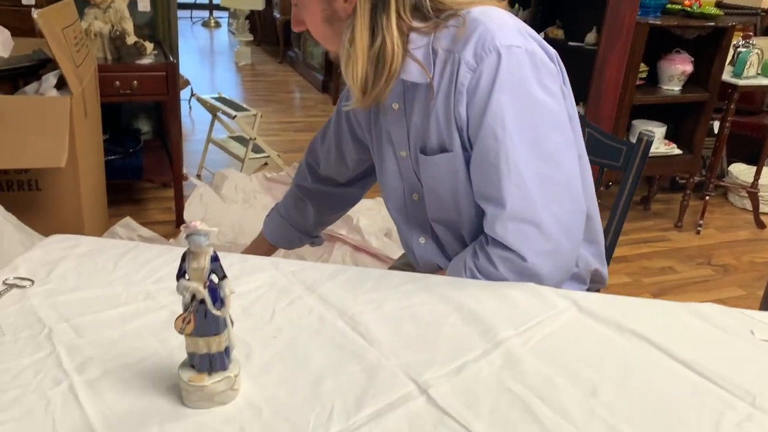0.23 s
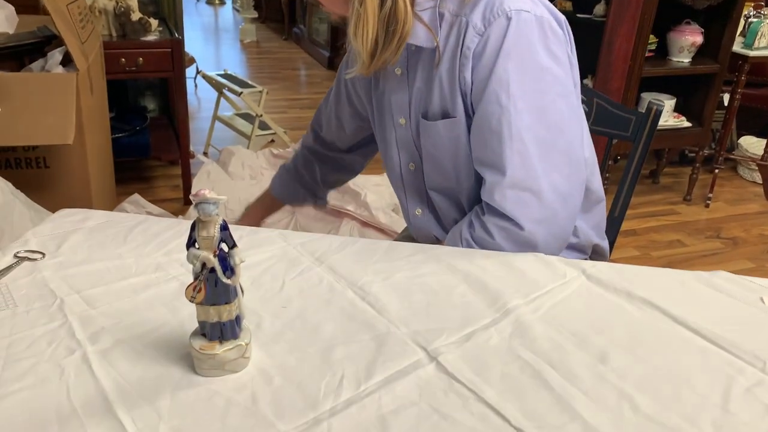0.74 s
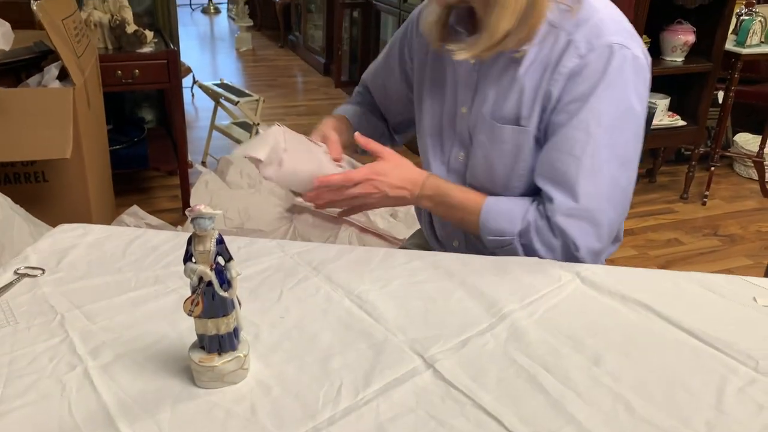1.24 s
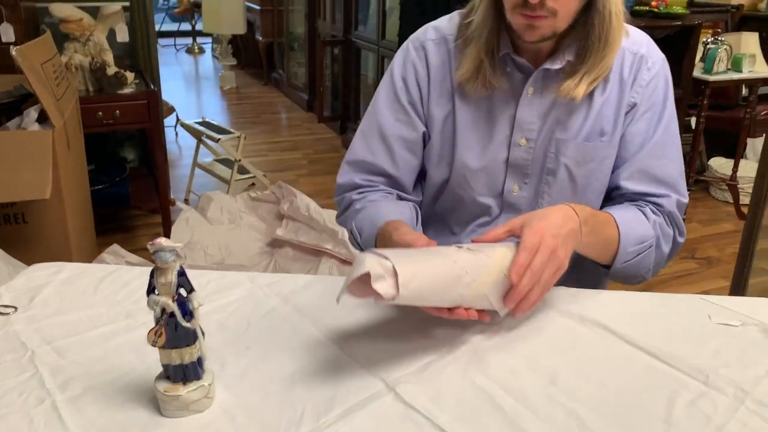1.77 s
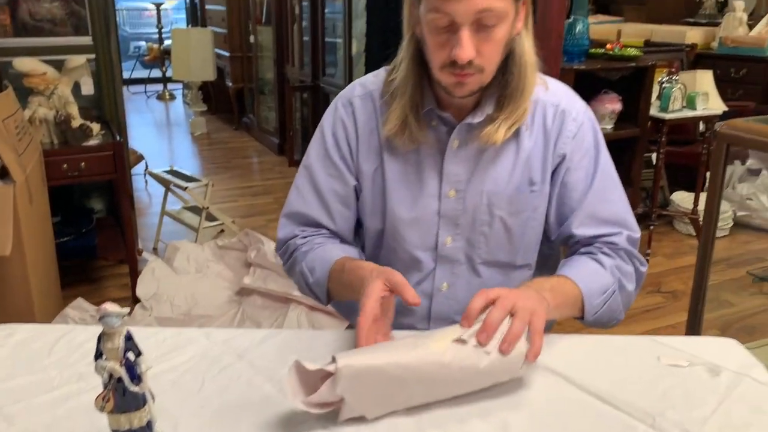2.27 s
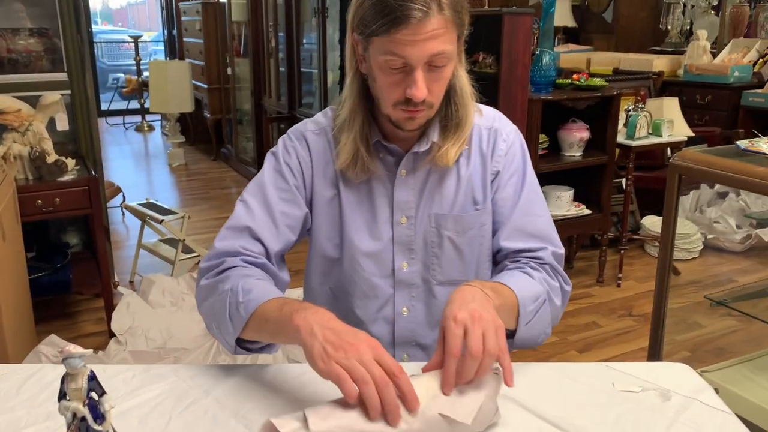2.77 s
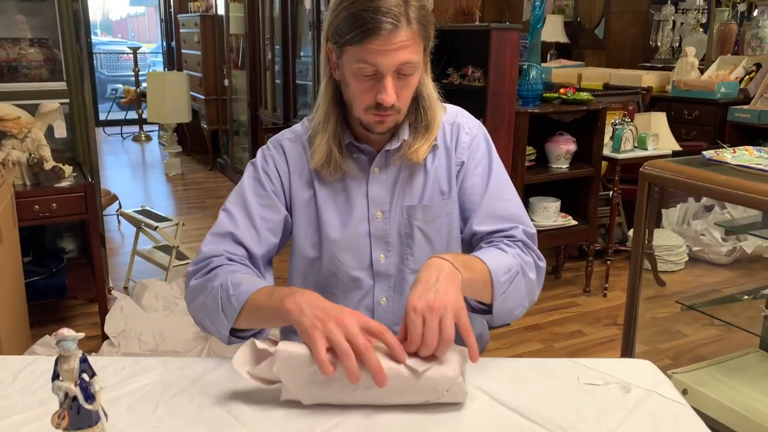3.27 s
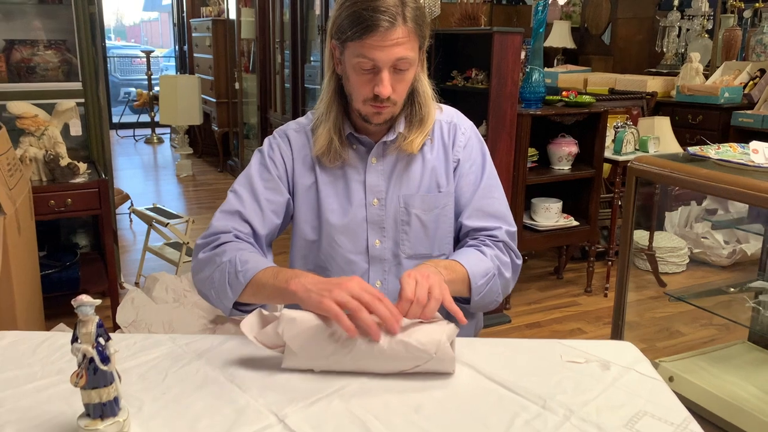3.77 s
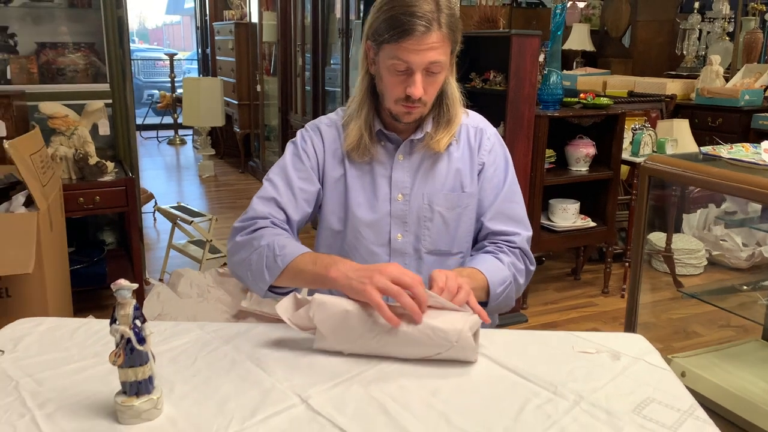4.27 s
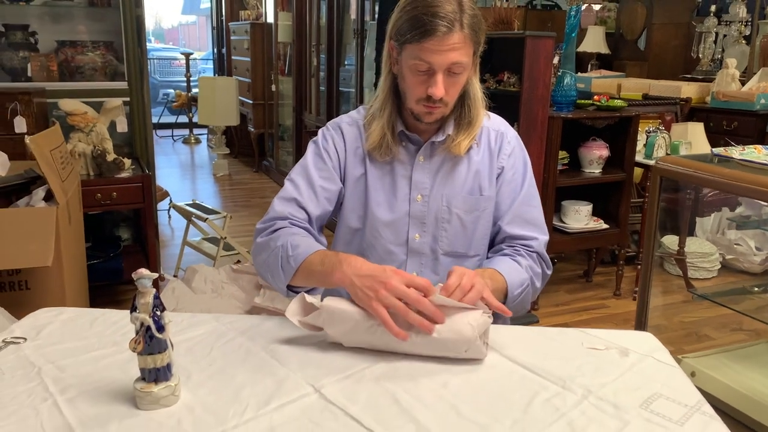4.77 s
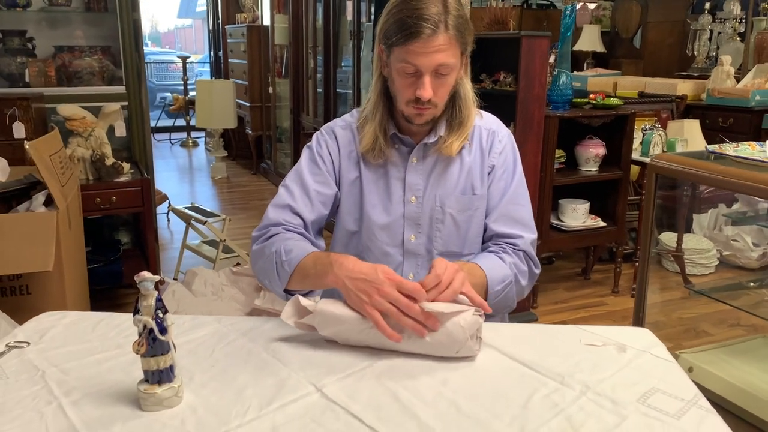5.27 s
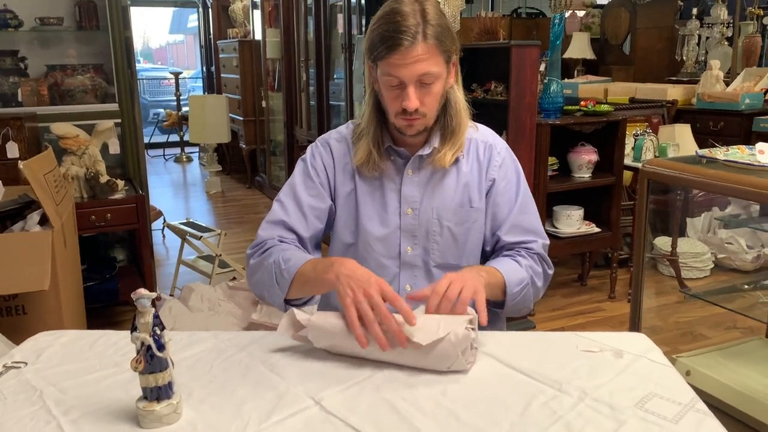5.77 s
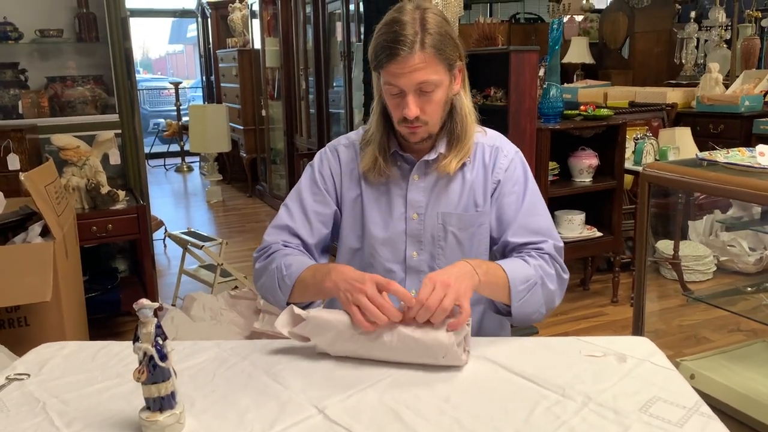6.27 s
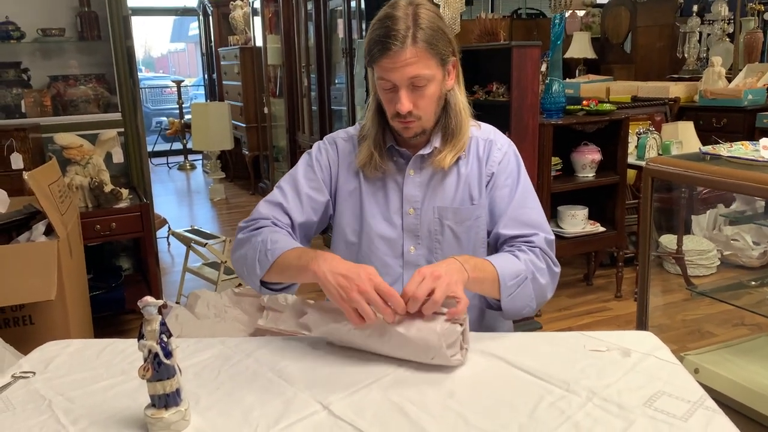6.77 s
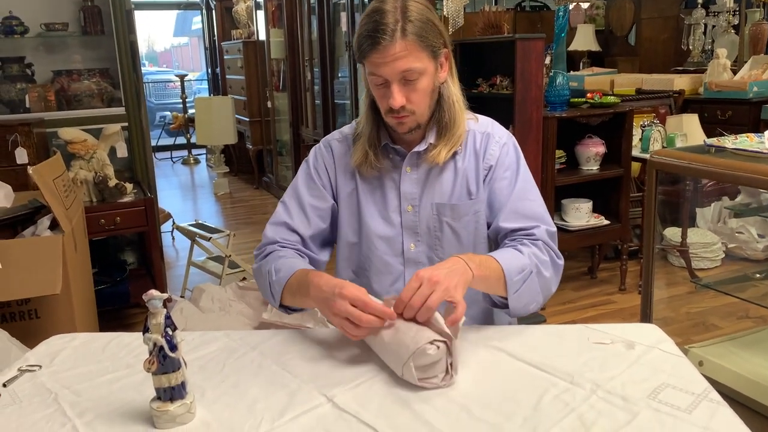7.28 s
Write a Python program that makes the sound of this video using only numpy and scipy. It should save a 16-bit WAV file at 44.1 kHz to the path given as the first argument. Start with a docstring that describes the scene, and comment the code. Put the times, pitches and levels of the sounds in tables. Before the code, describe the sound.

Stiff packing paper crackles and rustles close by as hands turn and unfold a wrapped bundle in a quiet, softly humming shop.

```python
"""A paper-wrapped bundle is lifted off a heap of packing paper, laid on a cloth-covered table and picked open.
Creases buckle in swarms of tiny filtered noise clicks, and stiff ones snap with a pitched crack.
Palms and sheets rub in denser swarms, and decaying sine modes make the hollow wrap pop dully.
A phone close by hears it in a quiet shop: a short room echo, over filtered-noise rumble and hum of ventilation."""
import sys
import numpy as np
from scipy import signal
from scipy.fft import rfft, irfft, next_fast_len
from scipy.io import wavfile
from scipy.ndimage import uniform_filter1d

SR = 44100
rng = np.random.default_rng(int(sys.argv[2]) if len(sys.argv) > 2 else 0)


def put_to_file(sound):
    """Save the sound as 16-bit audio at rate SR, in the file named by the first command-line argument."""
    columns = np.atleast_2d(sound).T  # one column per channel
    safe = np.clip(columns, -1, 1)
    whole_steps = np.round(safe * 32767)
    wavfile.write(sys.argv[1], SR, whole_steps.astype(np.int16))


N = 331382


def undb(db):
    """Decibels to gain."""
    return 10 ** (np.asarray(db) / 20)


def rms(x):
    """Root mean square."""
    return np.sqrt(np.mean(x ** 2))


def unit(x):
    """Scale a mid/side pair so that the mid has rms 1."""
    return x / rms(x[0])


def at(points, hz):
    """Read (Hz, value) points on a log-frequency axis."""
    f, value = np.transpose(points)
    return np.interp(np.log(hz + 1), np.log(f + 1), value)


def colour(x, points):
    """Causal minimum-phase filter with the given (Hz, dB) response, built by folding its cepstrum."""
    size = 2 * next_fast_len(x.shape[-1])
    gain = undb(at(points, np.fft.rfftfreq(size, 1 / SR)))
    cepstrum = irfft(np.log(gain))
    cepstrum[1:size // 2] *= 2
    cepstrum[size // 2 + 1:] = 0
    response = np.exp(rfft(cepstrum))
    return irfft(rfft(x, size) * response)[..., :x.shape[-1]]


def walk(rate):
    """Slow random drift, taking rate new values a second, with a spread near 1."""
    hold = int(SR / rate)
    steps = rng.standard_normal(N // 50)[np.arange(N) // hold]
    return np.sqrt(3 / 2) * uniform_filter1d(steps, hold)


def add(out, s, sound):
    """Mix a short sound in at time s."""
    start = max(int(s * SR), 0)
    out[:, start:start + sound.shape[1]] += sound[:, :max(N - start, 0)]


def facet(flip_s, ring_s, ring_db, patchy_db, size=1536, count=36):
    """One paper facet flips over, then the sheet around it rings briefly; every facet has its own resonances."""
    t = np.arange(size) / SR
    flip = t / flip_s * np.exp(1 - t / flip_s)
    ring = undb(ring_db) * np.exp(-t / ring_s) * (1 - np.exp(-t / flip_s))
    resonances = np.column_stack([np.geomspace(200, 18000, count), patchy_db * rng.standard_normal(count)])
    return unit(colour(rng.standard_normal((2, size)) * (flip + ring), resonances))


def swarm(rate, scatter_db, flip_s, ring_s, ring_db, patchy_db, dwell_s, count=120, size=24000):
    """Facets flip at random, rate times a second, their strengths scattered exponentially in dB; mid rms 1."""
    facets = [facet(flip_s, ring_s, ring_db, patchy_db) for _ in range(count)]
    rate = np.broadcast_to(rate, N)
    waits, strengths, strays = rng.exponential(size=(size, 3)).T
    starts = np.searchsorted(np.cumsum(rate) / SR, np.cumsum(waits))
    # positive scatter: many small and a few large; negative: the reverse
    gains = undb(scatter_db * np.minimum(strengths, 4))
    # a fold runs through one patch of paper for a moment, so neighbouring clicks share their colour
    patches = (starts / SR / dwell_s + strays / 2).astype(int) % count
    out = np.zeros((2, N))
    for k, start in enumerate(starts[starts < N]):
        # denser clicks are softer, so the rate alone does not raise the level
        add(out, start / SR, facets[patches[k]] * gains[k] / np.sqrt(rate[start]))
    return unit(out)


def steady(x, window_s=0.0384):
    """Even out a grainy sound to a mean power near 1, so that a separate curve sets its level."""
    power = uniform_filter1d(x[0] ** 2, max(int(window_s * SR), 8))
    return x / np.sqrt(power + np.mean(power) / 20)


# every movement swells, slackens while it lasts and dies away
ATTACK_S, SLACKEN_DB_PER_S, RELEASE_S = 0.016, 10, 0.018


def effort(movements, rest_db=(-80, -80)):
    """Level curves in dB: the power of swelling and fading movements adds to a resting level."""
    power = undb(np.reshape(rest_db, (len(rest_db), -1))) ** 2 * np.ones(N)
    t = np.arange(SR) / SR
    for start_s, length_s, *level_db in movements:
        attack = np.minimum(t / ATTACK_S, 1)
        release = np.exp(-np.maximum(t - length_s, 0) / RELEASE_S)
        shape = attack * undb(-SLACKEN_DB_PER_S * t) * release
        add(power, start_s, np.outer(undb(level_db), shape) ** 2)
    return 10 * np.log10(power)


# Spectrum of the duct rumble. Each row: frequency in Hz, relative level in dB per Hz.
RUMBLE_COLOUR = [(15, -33), (28, -12), (45, 0), (60, 1), (75, -1), (110, -8), (140, -3.5), (175, -9),
                 (290, -9.5), (520, -27), (1200, -31.5), (3000, -42), (9000, -50), (16000, -54)]
# Fan hum partials. Each row: mean frequency in Hz, rms level in dB around which it wavers.
FAN_HUM = [(90.5, -48), (312, -54.5)]


def ventilation(rumble_db=-39.5, waver_db=-2.0, swell_db=1.25):
    """Duct rumble is slowly swelling noise; the fan hum is sines wavering in pitch and level."""
    out = unit(colour(rng.standard_normal((2, N)), RUMBLE_COLOUR)) * undb(rumble_db + swell_db * walk(14))
    for hz, db in FAN_HUM:
        phase = 2 * np.pi * np.cumsum(hz * (1 + 0.02335 * walk(12))) / SR
        out[0] += np.sqrt(2) * undb(db + waver_db * walk(9.4)) * np.sin(phase)
    return out


# Loose sheets shift in the heap on the floor.
# Each row: start in seconds, length in seconds, rustle level in dB, crinkle level in dB before its trim.
HEAP_MOVES = [(0.0, 0.35, -55.5, -64), (0.177, 0.042, -42, -35), (0.265, 0.032, -40.5, -68),
              (0.297, 0.03, -35.5, -64), (0.385, 0.039, -45.5, -40.5), (0.435, 0.044, -34.5, -34.5),
              (0.49, 0.026, -37, -41), (0.52, 0.31, -44.5, -45), (0.62, 0.037, -44, -39),
              (0.67, 0.14, -34, -42), (0.712, 0.03, -32, -34), (0.785, 0.0051, -40, -27),
              (0.835, 0.025, -37.5, -68), (0.89, 0.044, -47, -75), (0.95, 0.0084, -41.5, -41),
              (1.066, 0.019, -50, -41)]
# Dull spectrum of the rustling heap. Each row: frequency in Hz, relative level in dB per Hz.
RUSTLE_COLOUR = [(100, -18), (200, -11), (320, -2), (560, -3.5), (750, -8), (1100, -9), (2500, -14),
                 (5000, -23), (9000, -31), (16000, -55)]


def heap(crinkle_trim_db=-1.5, wide_db=3):
    """Loose sheets on the floor shift, many at once; from behind the table their clicks arrive smeared and wide."""
    rustle_db, crinkle_db = effort(HEAP_MOVES)
    slips = swarm(700, scatter_db=2.8, flip_s=.001, ring_s=.012, ring_db=-6, patchy_db=3.5, dwell_s=.008)
    clicks = swarm(1200, scatter_db=-4.0, flip_s=0.00014, ring_s=0.0086, ring_db=0, patchy_db=5.5, dwell_s=.004)
    out = steady(colour(slips, RUSTLE_COLOUR)) * undb(rustle_db)
    out += unit(colour(clicks, CREASE_COLOUR)) * undb(crinkle_db + crinkle_trim_db)
    mid, side = out
    return np.array([mid, side * undb(wide_db)])


# small creases give way just before a big one: level relative to its crack, growth time, time to settle after it
STRAIN_DB, STRAIN_RISE_S, STRAIN_SETTLE_S = -17, 0.009, 0.005


def strain():
    """Small creases yield under the load that builds up to each snap: the power this adds to the crinkle."""
    t = np.arange(-4096, 4096) / SR
    shape = np.exp(np.minimum(t / STRAIN_RISE_S, -t / STRAIN_SETTLE_S))
    power = np.zeros((1, N))
    for s, level_db, *_ in CREASE_SNAPS:
        add(power, s + t[0], (undb(level_db + STRAIN_DB) * shape[None]) ** 2)
    return power[0]


# Bright spectrum of tiny creases. Each row: frequency in Hz, relative level in dB per Hz.
CREASE_COLOUR = [(300, -50), (1000, -6), (2200, -8.5), (3900, -1.5), (5800, -5.5), (7500, -3.5), (9500, 0),
                 (12500, -3), (16000, -14.5)]


def crinkle(level_db, trim_db=0.7, clump_db=0.84):
    """Bending the sheet sets off tiny creases in clumps, more of them the harder it is bent."""
    rate = 1500 * undb(.5 * (np.maximum(level_db, -60) + 37))  # 1500 clicks a second at -37 dB
    clicks = swarm(rate, scatter_db=4.1, flip_s=.00025, ring_s=.005, ring_db=-14, patchy_db=3.5, dwell_s=.016)
    return unit(colour(clicks, CREASE_COLOUR)) * undb(level_db + trim_db + clump_db * walk(45))


# each crease pings at its own pitch: level relative to its crack, decay in cycles
PING_DB, PING_CYCLES = -7, 3
# the panel beside it swings, the more the duller the crack: dB relative to the crack, dB per dB of tilt
SWING_DB, SWING_PER_TILT = -14, -0.96


def crease_ping(hz, size=1536):
    """The facet beside a crease rings for a few cycles at its own pitch."""
    cycles = np.arange(size) / SR * hz
    phase = 2 * np.pi * rng.random((2, 1))
    return unit(np.sin(2 * np.pi * cycles + phase) * np.exp(-cycles / PING_CYCLES) * (1 - np.exp(-cycles)))


# Creases that snap. Each row: start in seconds, crack level in dB rms over its first 4 ms,
# treble tilt in dB before the common lean, tail in dB before its trim, ping pitch in Hz.
CREASE_SNAPS = [(0.1962, -28.5, 12, 10, 10800), (0.31, -33.0, -11.5, 4, 3370), (0.439, -30.0, -2, 18, 6700),
                (0.9569, -38.5, -4.0, -5, 6500), (1.2259, -29.5, 6, -8, 9800),
                (1.683, -27.0, -3.0, -22.0, 4660), (1.732, -14.0, 12.5, -24.0, 10100),
                (1.758, -25.0, 2, -16.0, 6000), (1.767, -26, 4, -22.0, 10800), (1.795, -26, -3, -9, 1500),
                (1.8008, -21.0, 4, -6, 4600), (1.865, -23, 2, -6, 11500), (1.9202, -29, -7, -13, 6330),
                (2.0497, -32, 20, -16, 1527), (2.1581, -29.0, -9.5, -19, 1895),
                (2.2044, -28, -4, -14, 3970), (2.2277, -21, -5, -22.0, 11600), (2.245, -21, 1, -7, 5080),
                (2.2632, -26, 3, -16, 1580), (2.297, -16.0, 14, -28, 6850), (2.3343, -22.5, -2.5, -7, 6360),
                (2.4232, -29.0, -8, -19, 1710), (2.4758, -30, -5, -8.5, 2780), (2.626, -31, -2, -13, 1970),
                (2.8791, -23.5, -1, -10.0, 7150), (3.0006, -25.5, -5.5, -18.0, 10340),
                (3.0555, -26.5, -6.5, -19.5, 3500), (3.2032, -23.0, -1.5, -7, 6710),
                (3.28, -29.0, 2, -1, 10230), (3.3332, -27, -4, -8.5, 6000), (3.348, -26, 0, -16, 9600),
                (3.4494, -25, 0, 1, 4065), (3.4691, -28.5, -10, -21, 10040),
                (3.5219, -16.5, 5.5, -27, 9650), (3.5549, -20.5, 14, -17.0, 9510),
                (3.623, -29, 1, -14, 1510), (3.642, -29, 12, 10, 11460), (3.865, -28.0, 0, -9, 10490),
                (3.999, -26.0, 3.5, 2, 7600), (4.1927, -30, 5, -6, 3700), (4.2103, -23, 0.5, -14, 3590),
                (4.225, -28.0, 2, -6, 3124), (4.342, -22, 15, -24, 11620), (4.3995, -23, 23, -15.0, 9660),
                (4.5196, -10.5, 1, -3, 3895), (4.5462, -15, 5, -10, 10770), (4.5874, -26.5, 0, -22, 10860),
                (4.6297, -26.0, -6.5, -2, 3520), (4.6721, -31, -6, -16, 890), (4.701, -28.5, 2, 5, 3380),
                (4.7946, -34, -4, -2, 1993), (4.9926, -25, 12, -14, 11370),
                (5.0054, -24.5, -1, -16.5, 6440), (5.0304, -29, 25.0, -26.5, 11270),
                (5.0546, -18.5, 4, 0, 11460), (5.0608, -26, 2, -16, 11100), (5.306, -32, -0.5, -20, 10370),
                (5.458, -26.0, -1, 11, 10070), (5.5034, -13.5, -1, 8, 5010), (5.5123, -21, -1, 0, 11350),
                (5.5742, -19, 15, -32, 10070), (5.7299, -27.5, -7, 12, 3420), (5.7865, -22, -3.5, 14, 4940),
                (5.9192, -28.0, -1, -30, 10430), (6.1175, -21.5, -2, 1, 6600),
                (6.1369, -21.0, 2.5, -12, 11160), (6.157, -24.5, 6, -22, 10150),
                (6.1748, -24.5, 15, 7, 11340), (6.2345, -21.0, 1, -14, 11480), (6.2527, -25, -6.5, 7, 3680),
                (6.2854, -22.0, 10, -3, 10520), (6.3051, -23.5, 2, -18, 10930),
                (6.31, -14.5, 3.5, -10, 4600), (6.523, -30, -2, -13, 10020),
                (6.5791, -20.5, -3, -16, 10060), (6.6436, -24.5, 9.5, -10, 4555),
                (6.705, -25, 1, 6.0, 11020), (6.763, -31.5, 1, -16, 918), (6.8041, -20, 3, 2, 10700),
                (6.83, -29, 2, -16, 4140), (6.8528, -26, 2, -18.0, 3660), (6.8763, -28, -4, 5, 3930),
                (6.9539, -27.5, 4, 1, 10320), (6.968, -26.5, 5, 1, 3340), (7.0543, -29.5, -1, 21, 11010),
                (7.1587, -24.5, 2, -5, 3486), (7.3979, -24.5, 5, 2, 12100), (7.4394, -17, -5.5, -9, 1393),
                (7.4859, -26, -7, 3, 1285)]
# Spectrum of the crack. Each row: frequency in Hz, relative level in dB per Hz.
CRACK_COLOUR = [(300, -45), (1000, 0), (2200, -8.5), (3900, 2.5), (5800, -1), (7500, 1), (9500, 6.5),
                (12500, 0.5), (16000, -5)]
# Spectrum of the swinging panel. Each row: frequency in Hz, relative level in dB per Hz.
PANEL_COLOUR = [(100, -12.5), (200, -22), (310, -2.5), (600, -3.5), (1000, -5), (1500, -6), (2500, -7),
                (6000, -43.5)]


def snaps(tail_trim_db=-3, lean_db=-2, size=176):
    """A stiff crease gives way: a bright pitched crack, a shiver of the sheet, a slower swing of the panel."""
    out = np.zeros((2, N))
    for s, level_db, tilt_db, tail_db, hz in CREASE_SNAPS:
        swing_db = level_db + SWING_DB + SWING_PER_TILT * tilt_db
        slope_db = (tilt_db + lean_db) / 2
        # the quicker the flip, the brighter the crack
        flip_s = .00045 * undb(-slope_db)
        crack = facet(flip_s, ring_s=.009, ring_db=tail_db + tail_trim_db, patchy_db=2.5)
        crack = colour(colour(crack, CRACK_COLOUR), [(4500, -slope_db), (8500, slope_db)])
        ping = crease_ping(hz)
        crack = crack / rms(crack[0, :size]) + undb(PING_DB) * ping / rms(ping[0, :size])
        panel = colour(facet(flip_s=0.0018, ring_s=0.014, ring_db=10.0, patchy_db=-2.0), PANEL_COLOUR)
        add(out, s, crack / rms(crack[0, :size]) * undb(level_db))
        add(out, s, panel / rms(panel[0, :2 * size]) * undb(swing_db))
    return out


# the taut sheet sings after a crack: centre, width, decay, level relative to a crack of no tilt
SHEET_HZ, SHEET_WIDTH_HZ, SHEET_DECAY_S, SHEET_DB = 3560, 750, 0.0069, -18


def sheet_ring(size=4096):
    """Close modes of the taut sheet as a band of dying noise; rms 1 over the first decay time."""
    edges = [SHEET_HZ - SHEET_WIDTH_HZ / 2, SHEET_HZ + SHEET_WIDTH_HZ / 2]
    band = signal.butter(2, edges, "band", fs=SR, output="sos")
    decay = np.exp(-np.arange(size) / SR / SHEET_DECAY_S)
    ring = signal.sosfilt(band, rng.standard_normal((2, size))) * decay
    return ring / rms(ring[:, :int(SHEET_DECAY_S * SR)])


def sheet(tilt_loss=0.41):
    """Every snap leaves the sheet ringing, less so the more its crack tilts either bright or dull."""
    out = np.zeros((2, N))
    for s, level_db, tilt_db, *_ in CREASE_SNAPS:
        add(out, s, sheet_ring() * undb(level_db + SHEET_DB - tilt_loss * abs(tilt_db)))
    return out


# Dull pops and bumps of the hollow wrap.
# Each row: start in seconds, peak level in dB, centre in Hz, focus on that centre in dB per octave.
WRAP_POPS = [(0.3, -27.5, 300, 23), (1.034, -32.5, 330, 13), (1.271, -28, 318, 14), (1.796, -29, 420, 12),
             (1.861, -25, 673, 19), (2.068, -24, 540, 5), (2.118, -23.5, 760, 12), (2.422, -23.5, 792, 17),
             (2.563, -29.5, 709, 22), (2.671, -22.5, 554, 19), (2.683, -20, 600, 12), (2.712, -33, 564, 12),
             (2.945, -24, 800, 12), (3.045, -28, 310, 26), (3.119, -27, 901, 16), (3.467, -24, 601, 16),
             (3.617, -33, 707, 14), (3.852, -27.5, 342.4, 12), (4.03, -30.5, 428.6, 5),
             (4.5205, -16.5, 370, 9), (4.63, -21.5, 402, 9), (4.926, -25.5, 331.8, 7),
             (5.631, -16, 402, 21), (5.054, -28, 362, 18), (6.108, -35, 342, 20), (6.245, -29.5, 319.3, 18),
             (6.303, -22.5, 329, 8), (6.418, -27, 750, 24), (6.578, -25.5, 419.2, 16), (6.701, -21, 380, 9),
             (6.803, -17, 621, 14), (7.224, -28, 308, 31), (7.4384, -9, 641, 8)]
# Modes of the hollow wrap. Each row: frequency in Hz, level in dB, t60 in seconds before the hand damps it.
HOLLOW_MODES = [(225, 1, 0.031), (316.4, 1.5, 0.062), (400, 2.5, 0.021), (436.5, 2.5, 0.044),
                (509, 0, 0.051), (632, 2, 0.038), (755, 8, 0.018), (950, 6.5, 0.022), (1273, 13.5, 0.021),
                (1480, 15.5, 0.02)]


def pops(damped_share=0.86, push_s=0.0022, size=8192):
    """The wrap caves in or bumps the table; the place of the push picks which modes ring, and the hand damps them."""
    out, t = np.zeros((2, N)), np.arange(size) / SR
    hz, db, t60 = np.transpose(HOLLOW_MODES)[:, :, None]
    for s, peak_db, centre_hz, focus_db in WRAP_POPS:
        detune = 1 + 0.022 * rng.standard_normal(hz.shape)
        phase = 2 * np.pi * rng.random((2, len(hz), 1))
        gain = undb(db - focus_db * np.abs(np.log2(hz / centre_hz)))
        decay = np.exp(-np.log(1000) * t / (t60 * damped_share))
        modes = gain * decay * np.sin(2 * np.pi * hz * detune * t + phase)
        ring = modes.sum(axis=1) * (1 - np.exp(-t / push_s))
        add(out, s, ring / np.abs(ring[0]).max() * undb(peak_db))
    return out


def ticks(level_db, trim_db=-7):
    """Dry ticks of stiffer creases, about 90 a second, run through the crinkle at random and follow its level."""
    clicks = swarm(90, scatter_db=2.4, flip_s=.00014, ring_s=.003, ring_db=-22, patchy_db=4.5, dwell_s=.004)
    return unit(colour(clicks, CREASE_COLOUR)) * undb(level_db + trim_db)


# The roll goes from tight to loose: start and end of the loosening in seconds.
LOOSENING_S = [3.05, 5.27]


def looseness():
    """0 while the wrap is rolled tight, 1 once the folds have been picked loose."""
    return np.interp(np.arange(N) / SR, LOOSENING_S, [0, 1])


# hollow ring of the tight roll: level relative to the rubbing, and how much of it is lost once loose
ROLL_DB, ROLL_LOSS_DB = -10.5, 22
# Spectrum of the hollow ring of the tight roll. Each row: frequency in Hz, relative level in dB.
HOLLOW_COLOUR = [(200, -36), (440, -10.5), (580, 1.5), (800, 2), (1200, -12.5), (3000, -33.5)]
# Spectrum of rubbing palms and paper. Each row: frequency in Hz, relative level in dB per Hz.
RASP_COLOUR = [(100, -16), (400, -27.5), (580, -2), (1000, -3.5), (1500, -6), (2300, -8.5), (5000, -14.5),
               (16000, -15.5)]


def rubbing(level_db, trim_db=-1, clump_db=2.13):
    """Palms and layers of paper stick and slip in short rasps; the tight roll answers with a hollow ring."""
    slips = swarm(480, scatter_db=3.0, flip_s=.0004, ring_s=.006, ring_db=-14, patchy_db=3, dwell_s=.003)
    hollow = steady(colour(slips, HOLLOW_COLOUR)) * undb(ROLL_DB - ROLL_LOSS_DB * looseness())
    rasps = steady(colour(slips, RASP_COLOUR))
    return (rasps + hollow) * undb(level_db + trim_db + clump_db * walk(35))


# Spectrum of flapping panels. Each row: frequency in Hz, relative level in dB per Hz.
FLAP_COLOUR = [(100, -21.5), (200, -6), (310, 0), (420, -0.5), (600, -11.5), (900, -28), (3000, -26)]


def flexing(level_db):
    """The broad panels of the wrap flap as they bend."""
    flaps = swarm(500, scatter_db=1.5, flip_s=0.0008, ring_s=0.009, ring_db=2.0, patchy_db=4.0, dwell_s=.004)
    return steady(colour(flaps, FLAP_COLOUR)) * undb(level_db)


# crinkle slackens after a snap: full depth, delay of the deepest point, snap level that gives half that depth
RELIEF_DB, RELIEF_S, RELIEF_SNAP_DB = 8, 0.028, -26


def relief():
    """A snap takes the load off the sheet: how far the crinkle drops just after it, in dB."""
    t = np.arange(SR // 4) / SR / RELIEF_S
    shape = (t * np.exp(1 - t)) ** 4
    slack = np.zeros((1, N))
    for s, level_db, *_ in CREASE_SNAPS:
        add(slack, s, undb(level_db - RELIEF_SNAP_DB) * shape[None])
    return RELIEF_DB * slack[0] / (1 + slack[0])


GRIP_RUB_DB = 2.5  # rubbing of a resting hand, relative to its crinkle
# panels flex with crinkle and rubbing: relative level, weight of the rubbing, extra flap of loose panels
FLEX_DB, FLEX_RUB_SHARE, FLEX_LOOSE_DB = -9, 0.77, 3.5
# How firmly the bundle is held between strokes.
# Each row: time in seconds, crinkle level in dB before the trims.
HOLD = [(1.059, -72), (1.19, -56), (1.25, -46), (1.501, -48), (1.599, -42.5), (1.805, -42.5), (1.834, -52),
        (1.86, -43), (2.47, -42.5), (2.505, -56.5), (2.559, -56), (2.68, -44), (3.25, -44), (3.3, -50),
        (3.35, -44), (3.64, -44), (3.719, -46.5), (3.95, -43.5), (4.7, -45.5), (4.765, -56), (4.9, -53),
        (4.95, -42.5), (5.28, -47.5), (5.6, -42.5), (7.51, -41.5)]
# Strokes of the hands: lifting and turning the bundle, laying it down and smoothing the wrap,
# feeling for the edge of the sheet, picking the folds open, drawing the loose end away.
# Each row: start in seconds, length in seconds, crinkle and rubbing levels in dB before the trims.
HAND_STROKES = [ (1.24, 0.046, -34, -37), (1.54, 0.19, -40, -40), (1.725, 0.037, -34, -33),
                (1.85, .12, -37, -39.5), (1.915, 0.02, -33, -45), (2.04, 0.086, -45.5, -39),
                (2.215, 0.12, -35, -34), (2.39, 0.074, -44, -39), (2.56, 0.023, -47, -39),
                (2.645, 0.13, -47, -35.5), (2.775, 0.17, -40, -35), (2.92, 0.031, -44, -35.5),
                (3.0, 0.26, -38, -35), (3.335, 0.048, -38, -32), (3.445, 0.041, -38, -47),
                (3.525, 0.068, -39.5, -40), (3.59, 0.041, -33, -30), (3.89, 0.035, -39.5, -36),
                (4.05, 0.15, -40.5, -61), (4.2, 0.033, -39, -50), (4.36, 0.045, -40, -44),
                (4.485, 0.027, -41.5, -47), (4.52, 0.076, -33, -33.5), (4.615, 0.058, -34.5, -33.5),
                (4.915, 0.053, -35, -39), (4.985, 0.13, -31.5, -40.5), (5.135, 0.065, -33, -37),
                (5.485, 0.042, -29.5, -30.5), (5.56, 0.071, -35, -35.5), (5.68, 0.027, -36.5, -37),
                (5.715, 0.039, -34.5, -32), (5.835, 0.054, -36.5, -31.5), (5.925, 0.03, -38, -34.5),
                (6.055, 0.13, -34, -52), (6.215, 0.05, -33, -50), (6.285, 0.035, -32, -38),
                (6.405, 0.032, -37.5, -37), (6.49, 0.03, -33.5, -33), (6.755, 0.016, -44.5, -40),
                (6.795, 0.032, -33, -37), (6.87, 0.038, -35, -50), (7.135, 0.05, -37, -35),
                (7.203, 0.063, -35.5, -31.5), (7.44, 0.11, -36.5, -41)]


def hands():
    """Grip and strokes crinkle and rub the wrap; its panels flex along with both."""
    grip_db = np.interp(np.arange(N) / SR, *np.transpose(HOLD), left=-90)
    crinkle_db, rub_db = effort(HAND_STROKES, (grip_db, grip_db + GRIP_RUB_DB))
    crinkle_db = crinkle_db - relief()
    blend_db = crinkle_db + FLEX_RUB_SHARE * (rub_db - crinkle_db)
    flex_db = blend_db + FLEX_DB + FLEX_LOOSE_DB * looseness()
    strained_db = 10 * np.log10(undb(crinkle_db) ** 2 + strain())
    return crinkle(strained_db) + ticks(crinkle_db) + rubbing(rub_db) + flexing(flex_db)


# Layers of the wrap slide over each other. Each row: start in seconds, length in seconds, level in dB.
LAYER_SLIDES = [(1.88, 0.097, -34.5), (2.775, 0.061, -34.5), (2.825, 0.079, -34.5), (5.8, 0.089, -37),
                (7.135, 0.034, -29.5), (7.203, 0.065, -23.5)]
# Spectrum of the slide. Each row: frequency in Hz, relative level in dB per Hz.
BRUSH_COLOUR = [(300, -20), (1000, -3.5), (2200, -2), (4200, 1.5), (7000, -1.5), (10500, 3), (12500, 0.5),
                (16000, -12)]


def sliding(clump_db=1.0):
    """One layer of paper slides over another in a smooth, broad brush."""
    level_db = effort(LAYER_SLIDES, rest_db=(-80,))
    fibres = swarm(2500, scatter_db=1.5, flip_s=.0006, ring_s=.007, ring_db=-6, patchy_db=3, dwell_s=.006)
    return unit(colour(fibres, BRUSH_COLOUR)) * undb(level_db + clump_db * walk(43))


def room(dry, t60_s=0.36, treble_t60_s=0.26, wet_db=-9.0, onset_s=0.00041, size=16000, count=4):
    """The furniture scatters a short echo whose treble dies first; its pattern drifts at random."""
    t = np.arange(size) / SR
    shares = np.array([walk(5) for _ in range(count)])
    shares /= np.linalg.norm(shares, axis=0)
    lowpass = signal.butter(2, 3500, fs=SR, output="sos")
    echo = 0
    for share in shares:
        scatter = rng.standard_normal((2, size))
        low = signal.sosfiltfilt(lowpass, scatter)
        low_tail = low * np.exp(-np.log(1000) * t / t60_s)
        treble_tail = (scatter - low) * np.exp(-np.log(1000) * t / treble_t60_s)
        tail = (low_tail + treble_tail) * (1 - np.exp(-t / onset_s))
        tail = colour(unit(tail) / np.sqrt(size), [(300, -0.5), (4000, 3.5), (9000, 0.5), (16000, 2.0)])
        echo = echo + signal.oaconvolve(dry[:1] * share, tail, axes=1)[:, :N]
    return dry + undb(wet_db) * echo


# Stereo width at the two microphone ports. Each row: frequency in Hz, gain of the side signal in dB.
SIDE_GAIN = [(30, -17), (100, -11), (300, -11.5), (700, -6.5), (1400, -5), (2400, -2), (4000, -4),
             (5700, -5.5), (7200, -1), (8500, -49), (11000, -7), (12200, -34), (13300, -47), (14700, 3),
             (16000, 3)]


def scene():
    """All sources as mid and side, turned into left and right."""
    paper = hands() + sliding() + heap() + snaps() + sheet() + pops()
    mid, side = room(paper) + ventilation()
    side = colour(side, SIDE_GAIN)
    return np.array([mid + side, mid - side])


TOP_HZ = 16000
# Colour of the microphone ports. Each row: frequency in Hz, left minus right in dB.
BALANCE = [(60, -2.5), (110, 2), (200, -2.5), (380, 1.9), (700, 1.5), (1290, 1.5), (2380, 0.5), (4400, -3),
           (8120, -0.5), (15000, 0.5)]
# Phase between the ports. Each row: frequency in Hz, lead of the left in radians (negative: it lags).
LEFT_LEAD = [(0, 0), (2000, 0), (3200, .8), (5000, .8), (6600, .1), (8400, -3.14), (11000, -6.28),
             (13300, -9.42), (15500, -12.57)]


def record(dry):
    """The phone's ports differ in colour and phase, the left lagging in the high treble; peaks clip, the top is cut."""
    size = next_fast_len(N + 4096)
    hz = np.fft.rfftfreq(size, 1 / SR)
    lean = undb(at(BALANCE, hz) / 2)
    lead = np.exp(1j * np.interp(hz, *np.transpose(LEFT_LEAD)))
    ports = irfft(rfft(dry, size) * np.array([lean * lead, 1 / lean]), size)[:, :N]
    top_cut = signal.ellip(10, .2, 70, TOP_HZ, fs=SR, output="sos")
    return signal.sosfilt(top_cut, np.clip(ports, -1, 1))


dry = scene()
out = record(dry)
put_to_file(out)
```